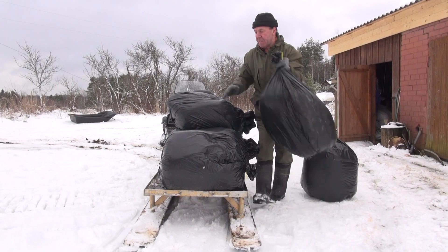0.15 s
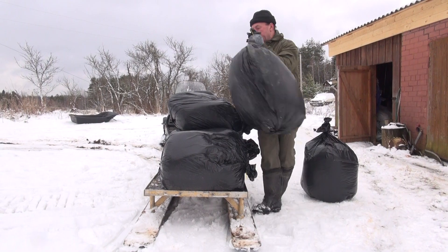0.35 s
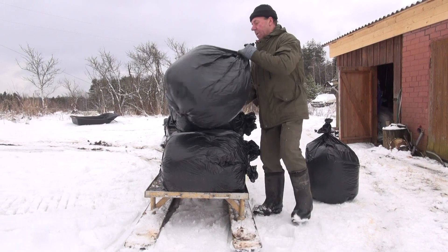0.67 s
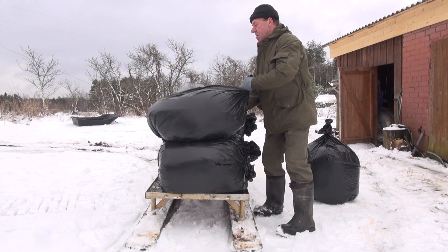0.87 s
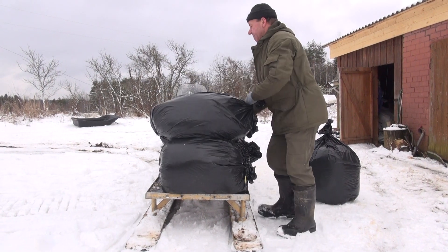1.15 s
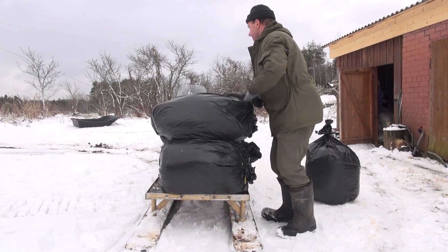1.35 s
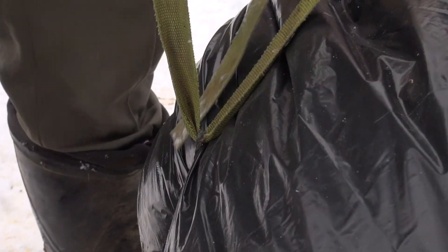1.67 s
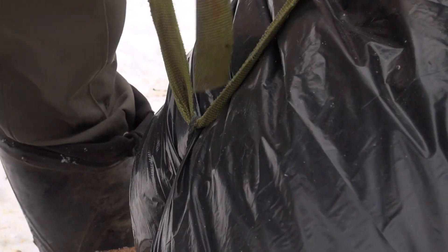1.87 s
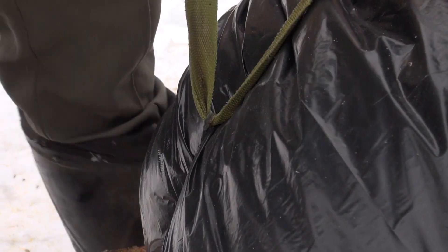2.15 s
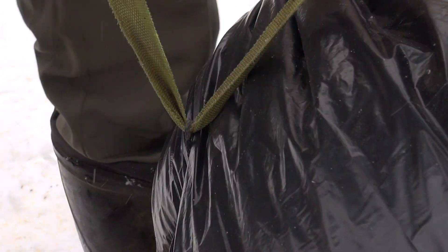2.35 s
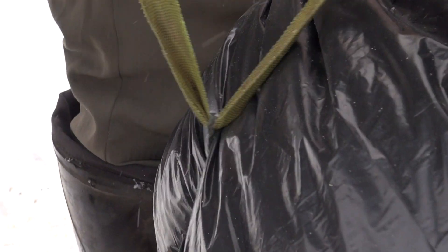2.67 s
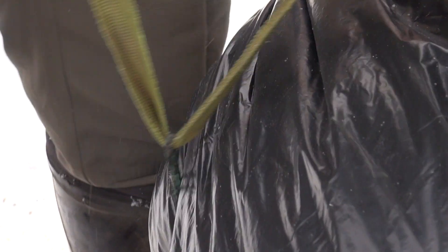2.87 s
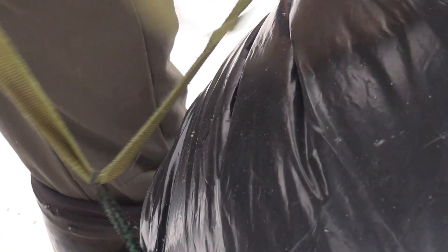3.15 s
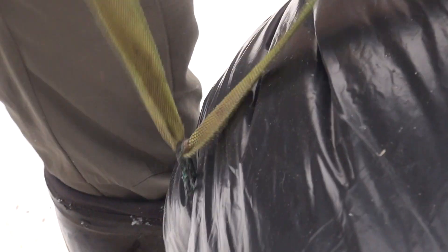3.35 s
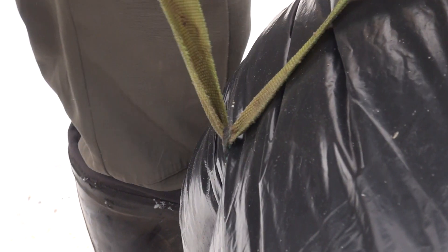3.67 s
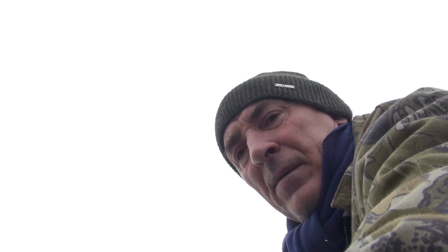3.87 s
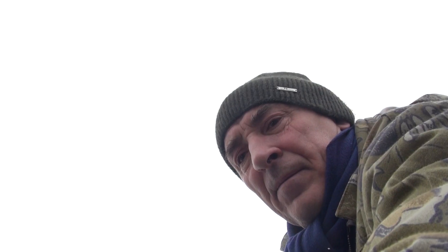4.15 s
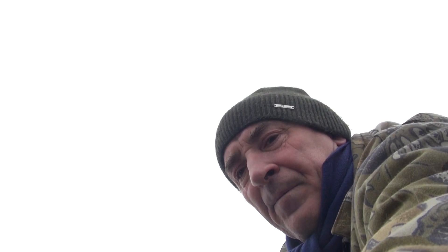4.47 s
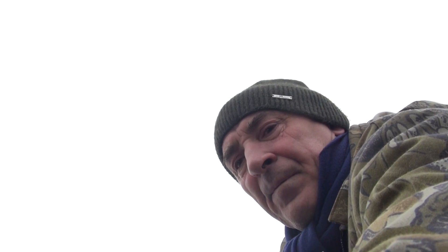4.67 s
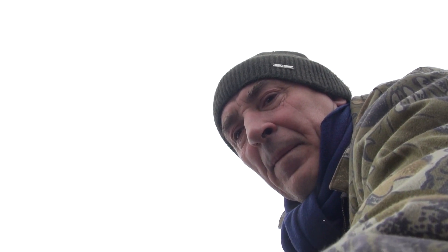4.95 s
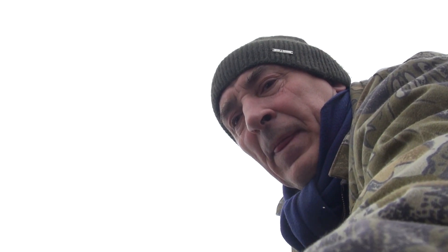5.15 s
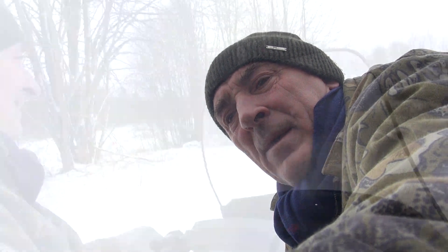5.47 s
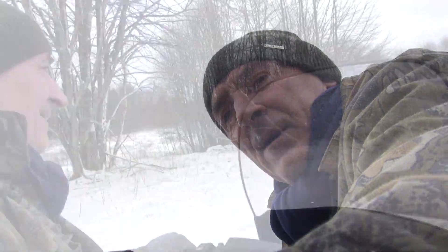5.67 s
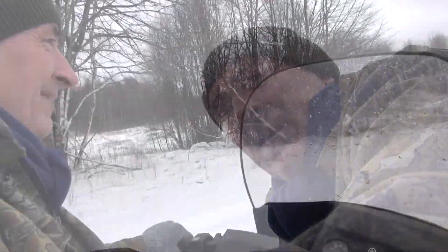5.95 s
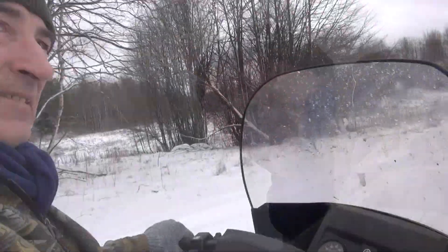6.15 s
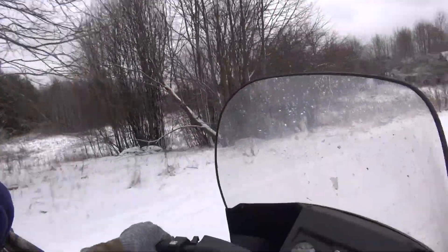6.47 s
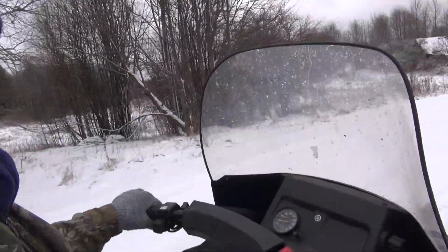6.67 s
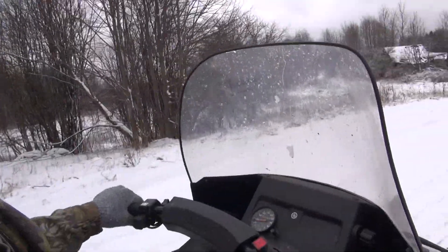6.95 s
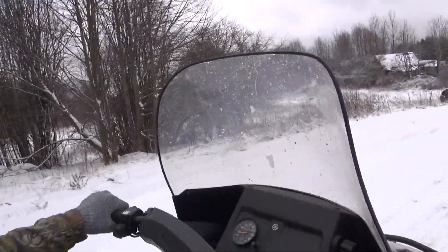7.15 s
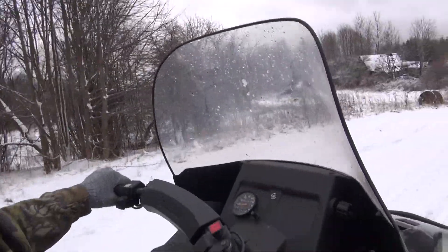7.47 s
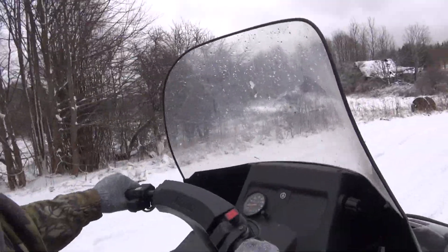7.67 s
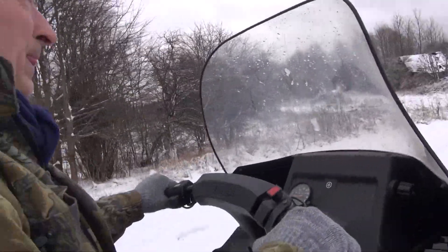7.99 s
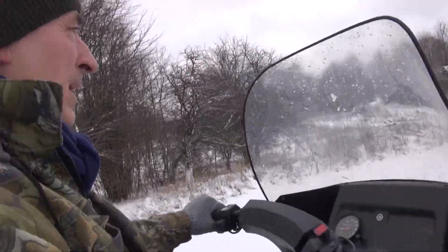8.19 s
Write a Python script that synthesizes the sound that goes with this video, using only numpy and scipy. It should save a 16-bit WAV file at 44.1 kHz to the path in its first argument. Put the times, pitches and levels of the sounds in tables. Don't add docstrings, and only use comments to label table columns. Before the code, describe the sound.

Rustling plastic film, dull bumps and brief strap squeaks from sack handling outdoors give way to a buzzing, roaring two-cylinder snowmobile engine.

```python
import sys
import numpy as np
from scipy import signal
from scipy.fft import rfft, irfft
from scipy.io import wavfile
from scipy.ndimage import uniform_filter1d

SR = 44100
rng = np.random.default_rng(int(sys.argv[2]) if len(sys.argv) > 2 else 0)


def gain_from_db(level_db):
    decades = np.asarray(level_db, float) / 20
    return 10 ** decades


def int16_out(signal):
    q = np.round(np.clip(np.atleast_2d(signal).T, -1, 1) * 32767)
    wavfile.write(sys.argv[1], SR, q.astype(np.int16))


N = 366912
T = np.arange(N) / SR
HZ = np.maximum(np.arange(N // 2 + 1) * SR / N, 1)
CUT_S, HANDLING_END_S = 3.895, 6.13


# frequency in Hz, level in dB.
YARD_COLOUR = [(24, -52), (40, -2), (147, 8), (296, -10.5), (527, -19.5), (869, -21.5), (1470, -20),
               (2140, -14), (2750, -18.5), (8900, -23.5), (11700, -25), (15800, -39.5)]
CLOSE_COLOUR = [(24, -48), (40, -15), (81, 6.5), (171, 6), (390, -9), (936, -22), (1230, -23.5),
                (4640, -32), (7660, -36), (12000, -31.5), (15800, -36.5)]
# frequency in Hz, difference in dB.
YARD_LEAN = [(60, -3), (180, 2), (550, -6.5), (1650, -1.5), (4970, -1.0), (15000, -1)]
CLOSE_LEAN = [(60, 2.7), (180, 5.4), (550, 15), (1650, 2), (4970, 0.84), (15000, 0.5)]
# frequency in Hz, likeness from 0 to 1.
YARD_ALIKE = [(60, 0.92), (180, 0.9), (550, 0.92), (1650, 0.98), (4970, 0.97), (15000, 0.86)]
CLOSE_ALIKE = [(60, 0.98), (180, 0.92), (550, 0.55), (1650, 1), (4970, 0.83), (15000, 0.45)]
# centre in Hz, width in Hz, change in dB.
YARD_DIPS = [
    (960, 210, -2),
    (2122, 240, -10),
    (8800, 600, 3),
    (9900, 190, -3.5),
]
# peak in seconds, peak in dB, rise in seconds, fall in seconds (both over 26 dB).
YARD_PULLS = [(0.02, -59, .3, .9), (0.33, -58.5, 0.93, 0.53), (0.833, -51, 0.23, 0.74),
              (0.953, -44, 0.24, 0.27), (1.098, -47, .4, 0.1), (1.237, -49.5, 0.15, 0.3),
              (1.541, -56.5, 0.27, 0.098), (1.751, -44.5, 0.068, 0.38), (1.875, -52, 0.6, 0.04),
              (2.05, -53.5, 0.15, 0.14), (2.33, -59.5, .6, 0.1), (2.43, -64.5, .2, 0.22),
              (2.764, -52.5, .04, .13), (2.928, -49.5, 0.2, 0.14), (3.058, -43.5, .1, 0.11),
              (3.183, -51.5, 0.16, 0.14), (3.238, -56.5, .1, 0.06), (3.43, -68.5, 0.16, 0.54),
              (3.677, -65.5, .25, 0.24)]
CLOSE_PULLS = [(3.906, -55, 0.057, .5), (4.04, -49.5, 0.13, 0.16), (4.085, -51, 0.24, 0.034),
               (4.2, -56.5, 0.1, 0.33), (4.28, -44.5, 0.17, 0.21), (4.485, -58, 0.22, 0.047),
               (4.575, -46, .05, 0.063), (4.744, -54.5, 1, .13), (4.824, -58.5, 0.054, 0.087),
               (4.95, -52, 0.12, 0.24), (5.045, -49.5, 0.37, 0.049), (5.123, -55, 0.091, 0.074),
               (5.253, -60, 0.14, 0.9), (5.463, -57.5, 0.25, 0.086), (5.792, -72, 0.099, 1),
               (6.011, -60, 0.59, .22)]
# crinkle at rest in dB, rustle at rest in dB, rustle over pull in
# dB, # slump and rumble at a middling pull in dB, share of the pull's swing in slump and in rumble (1 follows
YARD_LOAD = (-74, -70, 0.22, -57, -67.5, 0.83, -0.03)
CLOSE_LOAD = (-78, -66.5, 2, -61.5, -54.5, 1, 0.4)


def sacks(rows):
    yard_grains = grains(per_s=7000, spread_db=2.5, clump_db=1.5)
    close_grains = grains(per_s=6600, spread_db=1.5, clump_db=3.0)
    far = to_ports(*yard_grains, YARD_COLOUR, YARD_LEAN, YARD_ALIKE) * gain_from_db(dips(YARD_DIPS))
    near = to_ports(*close_grains, CLOSE_COLOUR, CLOSE_LEAN, CLOSE_ALIKE)
    yard = handling(YARD_PULLS, YARD_LOAD, far, rows) * (T < CUT_S)
    close = handling(CLOSE_PULLS, CLOSE_LOAD, near, rows) * (T >= CUT_S)
    return yard + close


def handling(pulls, load, ports, rows):
    crinkle_rest, rustle_rest, rustle_rel, slump_db, rumble_db, slump_share, rumble_share = load
    middling_db, shake_db = -56, -23.5
    power = effort(pulls)
    crinkle = np.sqrt(power + gain_from_db(2 * crinkle_rest))
    rustle = np.sqrt(power * gain_from_db(2 * rustle_rel) + gain_from_db(2 * rustle_rest))
    swing_db = uniform_filter1d(20 * np.log10(rustle), size=SR // 12) - middling_db
    slump_power = gain_from_db(2 * (slump_db + slump_share * swing_db))
    slump = np.sqrt(slump_power + shaking(rows[:, 0], rows[:, 3] + shake_db))
    rumble_power = gain_from_db(2 * (rumble_db + rumble_share * swing_db))
    rumble = np.sqrt(rumble_power + shaking(rows[:, 0], rows[:, 1] + shake_db))
    rumble = rumble * gain_from_db(4.2 * drift(26))
    film = crinkle * band(ports, 5000, 20000) + rustle * band(ports, 1200, 5000)
    return film + slump * band(ports, 400, 1200) + rumble * band(ports, 20, 400)


def grains(per_s, spread_db, clump_db):
    lumps = .5 * drift(25) + drift(90)
    clump = gain_from_db(clump_db * lumps)
    size = gain_from_db(spread_db * np.minimum(rng.exponential(1, (2, N)), 5))
    size = size * rng.choice([-1, 1], (2, N))
    clicks = size * (rng.random((2, N)) < per_s * clump / SR)
    return rms_one(clicks) + 0.56 * clump * rng.standard_normal((2, N))


def effort(pulls):
    squareness = 1.13
    power = 0
    for s, db, rise, fall in pulls:
        away = np.maximum((s - T) / rise, (T - s) / fall)
        power = power + gain_from_db(2 * db - 52 * away ** squareness)
    return power


def shaking(s, db):
    t60_s = 0.28
    kicks = np.full(N, 1e-18)
    np.add.at(kicks, (s * SR).astype(int), gain_from_db(2 * db))
    return signal.lfilter([1], [1, -gain_from_db(-120 / (t60_s * SR))], kicks)


def dips(rows):
    return sum(depth_db * np.exp(-((HZ - hz) / width) ** 2) for hz, width, depth_db in rows)


# start in seconds, body in dB, knock in dB.
KNOCKS = [(0.042, -38, -35.5), (0.292, -41, -33.5), (0.344, -37.5, -42), (0.447, -24, -27.5),
          (0.495, -48, -38), (1.306, -23.5, -27.5), (1.393, -38.5, -36), (1.467, -40.5, -32.5),
          (1.654, -41, -42), (1.703, -47, -34), (1.747, -49, -29), (1.761, -26, -25.5), (1.838, -23.5, -22),
          (1.876, -31, -29), (1.911, -21, -19), (1.926, -25.5, -27.5), (1.948, -33, -43),
          (2.235, -27.5, -33), (2.475, -36, -35), (2.525, -27.5, -31), (2.573, -33, -34.5),
          (2.595, -33.5, -33), (3.074, -32.5, -36), (3.42, -44, -46), (3.469, -26.5, -32.5),
          (3.584, -43, -42), (3.61, -32, -36), (3.636, -34, -43), (3.828, -26.5, -28.5)]
# start in seconds, body in dB, body pitch in Hz.
BUMPS = [(0.91, -34, 180), (1.07, -29, 134), (1.354, -33, 127), (2.038, -31.5, 127), (2.457, -29, 196),
         (3.337, -42, 81), (3.91, -44, 205), (3.945, -42, 171), (3.99, -37, 162), (4.016, -27, 192),
         (4.041, -35, 186), (4.067, -26, 153), (4.193, -22, 135), (4.255, -27, 221), (4.548, -28, 207),
         (4.571, -20.5, 165), (4.585, -17.5, 162), (4.667, -31, 199), (4.683, -22.5, 147),
         (4.707, -25.5, 176), (4.737, -22.5, 139), (4.913, -33, 174), (4.969, -35, 138), (5.015, -27, 187),
         (5.038, -32, 150), (5.114, -35, 177), (5.292, -32, 115), (5.8, -20, 172), (5.832, -18.5, 172),
         (5.99, -24, 189)]
# start in seconds, body in dB, change per touch in dB,
# body pitch in Hz, knock over body in dB.
TUMBLES = [
    (0.942, -26, -1.36, 226, 1),
    (4.27, -21, -2.5, 189, -12),
    (6.005, -27.5, -2, 264, 0),
]


def contacts():
    touches, touch_s, settle = 8, .0155, .96
    rows = [(s, db, 172 - 2.0 * (db + 26.5), knock_db) for s, db, knock_db in KNOCKS]
    rows += [(s, db, hz, db - 16) for s, db, hz in BUMPS]
    lucks = rng.uniform(-1, 1, (len(TUMBLES), touches, 2))
    for (s, db, step_db, hz, knock_db), luck in zip(TUMBLES, lucks):
        for k, (late, hard) in enumerate(luck):
            start = s + touch_s * (k + 0.254 * late * (k > 0))
            touch_db = db + step_db * k
            rows.append((start, touch_db + 3.6 * hard, hz * settle ** k, touch_db + knock_db - 4 * hard))
    return np.array(rows)


# rise in seconds, time to fall 60 dB in seconds, deeper heave in dB.
SWING = [
    (.003, .05, -8),
    (.0065, .063, -4),
]


def thuds(rows):
    out, t = np.zeros((2, N)), T[:SR // 8]
    for (s, body_db, body_hz, knock_db), luck in zip(rows, rng.random((len(rows), 3))):
        turns = body_hz * (t + 0.0024 * (1 - np.exp(-t / 0.0015)))
        rise, t60, heave_db = SWING[int(s > CUT_S)]
        body = (1 - np.exp(-t / rise)) * gain_from_db(-60 * t / t60) * np.sin(2 * np.pi * turns)
        heave = (1 - np.exp(-t / 0.015)) * gain_from_db(heave_db - 60 * t / 0.093)
        heave = heave * np.sin(2 * np.pi * 0.602 * turns)
        knock_hz = 370 + 280 * luck[0]
        ring = np.sin(2 * np.pi * knock_hz * t) + 0.52 * np.sin(2 * np.pi * 1.855 * knock_hz * t)
        tap = (1 - np.exp(-t / 0.00065)) * gain_from_db(-60 * t / 0.012) * ring
        second = np.interp(t - .0022 - 0.00209 * luck[1], t, tap, left=0)
        knock = tap + 0.55 * second
        lean_db = 7.0 if s > CUT_S else luck[2] - .6
        add(out, s - .0008, gain_from_db(body_db + 2.5) * (body + heave) - gain_from_db(knock_db + 1.5) * knock, lean_db)
    return out


# start in seconds, peak in dB.
SNAPS = [(0.1855, -34), (0.2566, -35), (0.328, -46), (0.6875, -34), (0.7706, -32), (0.827, -23),
         (0.881, -34), (1.1614, -36), (1.288, -36), (1.748, -26.5), (1.9938, -40), (2.044, -29),
         (2.05, -36), (2.0916, -35.5), (2.268, -40), (2.7885, -38), (3.0507, -34), (3.0793, -27.5),
         (4.281, -27), (4.4698, -49), (4.487, -34), (4.5765, -36), (4.6552, -35), (4.7697, -41),
         (4.824, -41), (5.7913, -38)]


def snaps():
    out, t = np.zeros((2, N)), T[:SR // 100]
    for (s, peak_db), noise in zip(SNAPS, rng.standard_normal((len(SNAPS), len(t)))):
        top_hz = 15000 if s > CUT_S else 10000
        bright = signal.butter(2, [2000, top_hz], "band", fs=SR, output="sos")
        add(out, s - .0003, gain_from_db(peak_db) * signal.sosfilt(bright, noise * gain_from_db(-60 * t / .006)), -.4)
    return out


# start in seconds, pitch in Hz, half-width in Hz, level in dB,
# time to fall 60 dB in seconds.
SQUEAKS = [
    (5.35, 4650, 300, -39, .1),
    (5.362, 2560, 50, -39, .07),
    (5.422, 1910, 45, -39, .13),
    (4.83, 4700, 50, -46, .14),
]


def squeaks():
    out, t = np.zeros((2, N)), T[:SR // 10]
    noises = rng.standard_normal((len(SQUEAKS), len(t)))
    for (s, hz, half_hz, level_db, t60), noise in zip(SQUEAKS, noises):
        narrow = signal.butter(2, [hz - half_hz, hz + half_hz], "band", fs=SR, output="sos")
        rough = rms_one(signal.sosfilt(narrow, noise))
        swell = (1 - np.exp(-t / .012)) ** 2 * gain_from_db(-60 * t / t60)
        add(out, s, gain_from_db(level_db) * swell * rough, 1.5)
    return out


# time in seconds, pitch in Hz, level in dB.
DRAG = [
    (3.895, 199.8, -49),
    (3.98, 183, -43),
    (4.01, 180.8, -63),
    (4.19, 200.7, -68),
    (4.21, 270, -41),
    (4.235, 335, -40),
    (4.265, 270, -38),
    (4.29, 243, -75),
]


def drag():
    hz, level_db = in_time(DRAG)
    turns = np.cumsum(hz * (1 + 0.036 * drift(58))) / SR
    hum = gain_from_db(level_db + 1.9 * drift(50)) * np.sin(2 * np.pi * turns)
    return hum * (T >= CUT_S) * gain_from_db([[4], [-4.5]])


# time in seconds, level in dB.
ROAR = [
    (5.3, -66),
    (5.55, -50.5),
    (5.9, -44),
    (6.3, -41.5),
    (7.4, -39.5),
    (8.32, -42.5),
]
# time in seconds, crank turns per second.
CRANK = [
    (5.9, 74.9),
    (6.3, 76.9),
    (6.6, 78.4),
    (6.82, 78.9),
    (7.12, 77.5),
    (7.31, 78.6),
    (7.61, 78.3),
    (7.77, 76.8),
    (8.3, 76.1),
]
CLEAN_ORDERS = (2, 3, 4, 5, 6, 8)
# level over the roar in dB,
# best speed in turns per second, loss in dB per squared turn per second.
ORDER_TUNING = [
    (-0.6, 78.9, 0.45),
    (-3.5, 78, 0.5),
    (3, 75.37, 0.83),
    (-1.5, 78.5, 0.6),
    (-2.5, 75.8, 0.5),
    (-5.5, 75, 0.6),
]
# multiple of the crank rate, level over the roar in dB,
# wobble in Hz.
ROUGH_ORDERS = [(1.0, -11, 6), (7.05, -9, 14), (9.05, -16, 6), (10.05, -15, 4), (11.2, -18, 8),
                (12.4, -14, 5), (13.35, -13, 3), (14.1, -16, 4), (15.85, -14, 5), (20.2, -17, 8),
                (21.75, -12, 8), (30.0, -21, 20), (46.5, -27, 8), (52.8, -23, 25)]
# frequency in Hz, level in dB.
ROAR_COLOUR = [(24, -52), (40, -14), (101, -6.5), (143, -3.5), (268, -0.5), (311, -6.5), (344, -5),
               (380, -3.5), (612, -7), (676, -9.5), (1710, -10.5), (1930, -13.5), (8260, -34),
               (12600, -43.5), (15800, -58)]
# frequency in Hz, difference in dB.
ENGINE_LEAN = [(60, 1), (180, 1.5), (550, -5.5), (1650, -4.0), (4970, -4.0), (15000, -3.5)]
# frequency in Hz, likeness from 0 to 1.
ENGINE_ALIKE = [(60, 0.86), (240, 0.95), (950, 0.96), (3770, 1), (15000, 0.96)]


def engine():
    (roar_db,), (speed,) = in_time(ROAR), in_time(CRANK)
    crank = 2 * np.pi * np.cumsum(speed + 0.26 * drift(8.2)) / SR
    sound = clean_orders(crank, speed, roar_db) + rough_orders(crank, roar_db)
    sound = sound + gear_whine(speed, roar_db) + exhaust_roar(crank, roar_db)
    return sound * np.clip((T - 5.2) / 0.26, 0, 1)


def clean_orders(crank, speed, roar_db):
    tones = np.zeros((2, N))
    for k, (rel_db, best, loss_db) in zip(CLEAN_ORDERS, ORDER_TUNING):
        level_db = roar_db + rel_db - loss_db * (speed - best) ** 2
        wave = np.sin(k * crank + 1.5 * drift(1.5))
        tones += np.sqrt(2) * gain_from_db(level_db + 2.5 * drift(7)) * wave * order_lean(k)
    return tones


def rough_orders(crank, roar_db):
    tones = np.zeros((2, N))
    for k, rel_db, wobble_hz in ROUGH_ORDERS:
        wave = (1 + .7 * drift(wobble_hz)) * np.sin(k * crank) + .7 * drift(wobble_hz) * np.cos(k * crank)
        tones += gain_from_db(roar_db + rel_db - 2) * wave * order_lean(k)
    return tones


def order_lean(k):
    return gain_from_db(at_hz(ENGINE_LEAN, k * 77) / 2 * np.array([[1], [-1]]))


def gear_whine(speed, roar_db):
    whine_db = roar_db - 16 + 4.5 * (speed - 78)
    turns = np.cumsum(39.85 * speed + 15 * drift(30)) / SR
    return gain_from_db(whine_db + 2.2 * drift(25)) * np.sin(2 * np.pi * turns) * gain_from_db([[-2], [2]])


def exhaust_roar(crank, roar_db):
    firing = 1 + 0.1 * np.cos(2 * crank)
    ports = to_ports(*rng.standard_normal((2, N)), ROAR_COLOUR, ENGINE_LEAN, ENGINE_ALIKE)
    growl = gain_from_db(-4.0 + 1.8 * drift(11)) * band(ports, 20, 495)
    roar = gain_from_db(-3.5 + 1.0 * drift(31)) * band(ports, 676, 2630)
    hiss = gain_from_db(-12.5 + 1.3 * drift(38)) * band(ports, 3290, 20000)
    return gain_from_db(roar_db) * firing * (growl + roar + hiss)


def mic_hiss():
    return gain_from_db(-71) * np.diff(rng.standard_normal(N + 1)) / 2


def rms_one(x):
    return x / np.sqrt(np.mean(x ** 2) + 1e-20)


def in_time(rows):
    s, *columns = np.transpose(rows)
    return [np.interp(T, s, c) for c in columns]


def at_hz(points, hz):
    point_hz, value = np.array(points).T
    return np.interp(np.log(hz), np.log(point_hz), value)


def drift(rate_hz):
    r = np.exp(-32 * np.pi * min(rate_hz, 400) / SR)
    noise = rng.standard_normal(N // 16 + 2002)
    slow = signal.lfilter([1], [1, -2 * r, r * r], noise)[2000:]
    return np.interp(np.arange(N) / 16, np.arange(len(slow)), rms_one(slow))


def to_ports(mid, side, colour, lean, alike):
    c = np.clip(at_hz(alike, HZ), 0, 1)
    shared = rfft(mid) * np.sqrt(1 + c)
    unshared = rfft(side) * np.sqrt(1 - c)
    half_db = at_hz(lean, HZ) / 2
    left = (shared + unshared) * gain_from_db(half_db)
    right = (shared - unshared) * gain_from_db(-half_db)
    return gain_from_db(at_hz(colour, HZ)) * np.array([left, right])


def band(spectra, low_hz, high_hz):
    edges = np.sqrt((1 + (low_hz / HZ) ** 6) * (1 + (HZ / high_hz) ** 6))
    x = irfft(spectra / edges, N)
    return x / np.std(x.mean(axis=0))


def add(out, s, shape, lean_db):
    i = round(s * SR)
    out[:, i:i + len(shape)] += shape * gain_from_db([[lean_db / 2], [-lean_db / 2]])


def scene():
    rows = contacts()
    handled = (sacks(rows) + mic_hiss()) * (T < HANDLING_END_S)
    return handled + thuds(rows) + snaps() + squeaks() + drag() + engine()


def roll_off(x):
    return signal.sosfilt(signal.butter(12, 15810, fs=SR, output="sos"), x)


def record(dry):
    mid = rfft(dry[0] + dry[1]) / 2
    side = rfft(dry[0] - dry[1]) / 2 * (HZ < 11700)
    merged = irfft(np.array([mid + side, mid - side]) * (HZ < 15800), N)
    bass_cut = signal.butter(2, 40, "high", fs=SR, output="sos")
    return roll_off(signal.sosfilt(bass_cut, merged))


dry = scene()
out = record(dry)
int16_out(out)
```